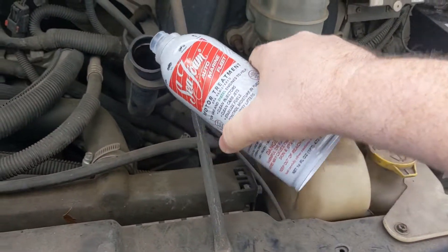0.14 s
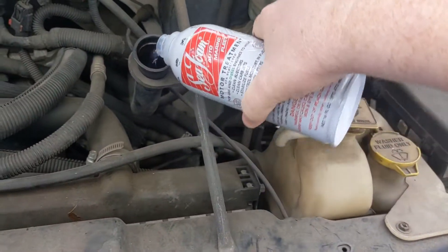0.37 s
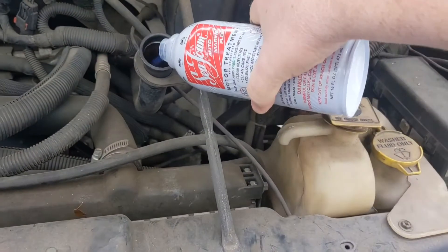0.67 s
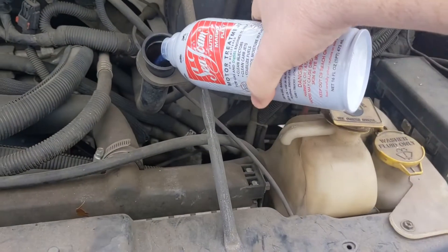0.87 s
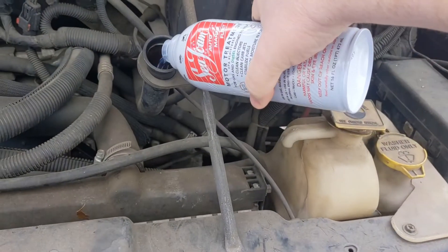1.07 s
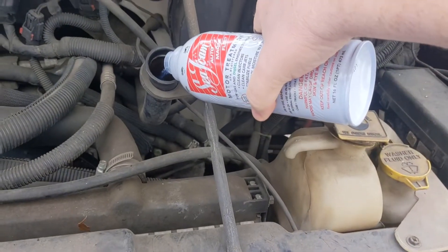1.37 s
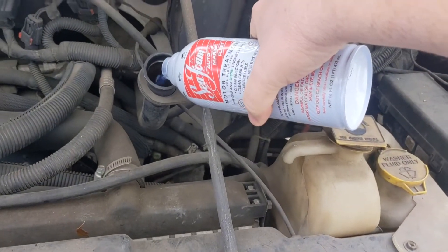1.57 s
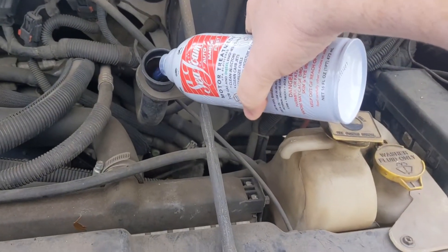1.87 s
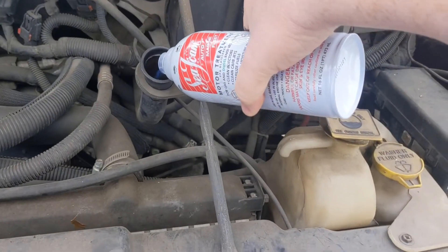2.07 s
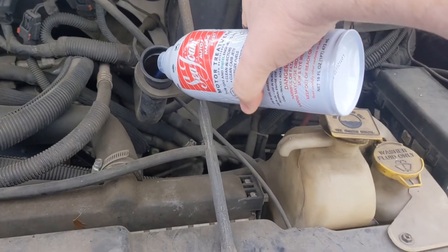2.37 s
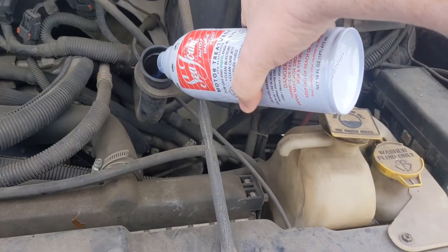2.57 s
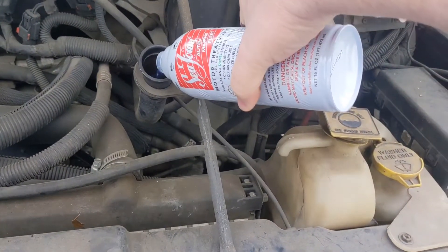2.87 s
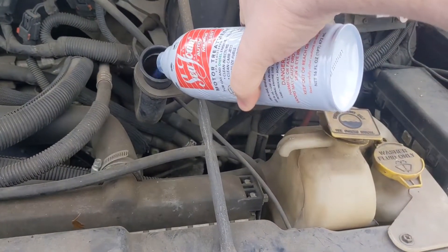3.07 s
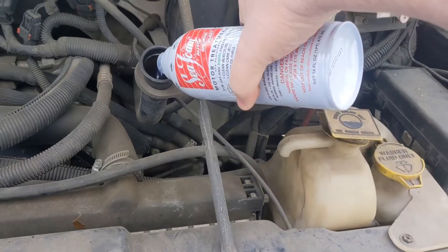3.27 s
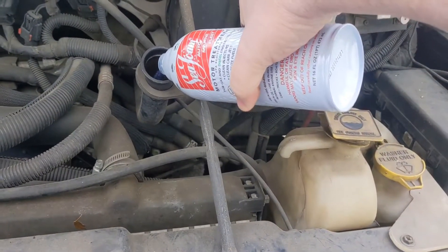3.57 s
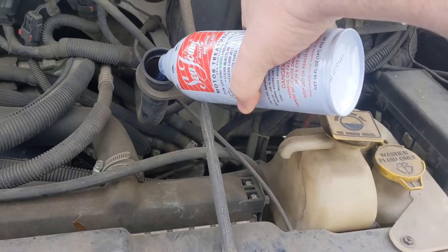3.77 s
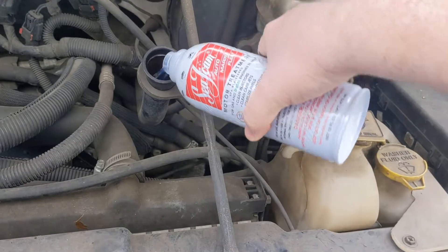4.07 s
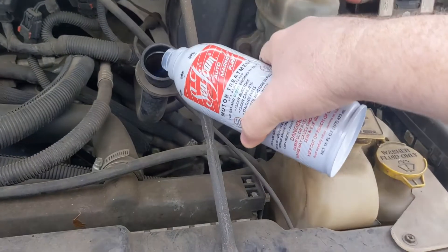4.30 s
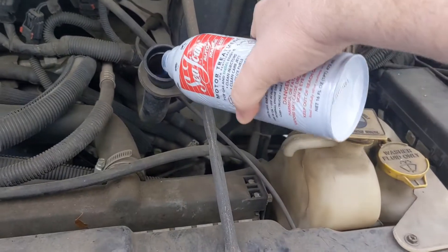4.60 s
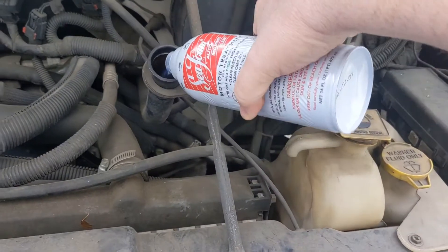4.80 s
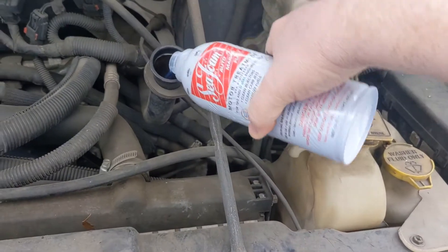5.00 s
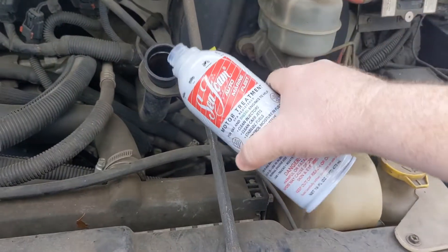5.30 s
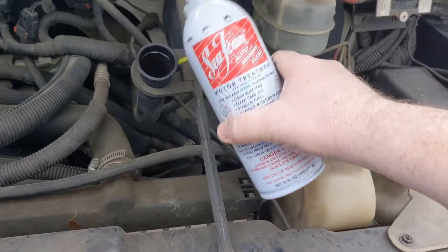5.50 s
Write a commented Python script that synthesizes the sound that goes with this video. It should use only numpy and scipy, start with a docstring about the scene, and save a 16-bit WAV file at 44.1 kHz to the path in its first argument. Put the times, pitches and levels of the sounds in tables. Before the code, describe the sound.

Thin liquid trickles and bubbles from a metal can into a hollow engine filler neck while low breeze buffets the microphone outdoors.

```python
"""Outdoors, a thin liquid runs from a metal can into an engine's oil filler neck, close to a camera.
From the start the stream rushes, treble hiss rises and falls and a breeze (all shaped noise) buffets both ports.
Films burst (noise bursts) in the hollow neck (resonances), and gusts follow with eddies (slow swings).
Bubbles then plink (damped sines that sharpen), drops tick (short noise) and later the can gulps low.
The breeze drops for a moment partway, then returns; faint outdoor air (noise) lies under it all."""
import sys
import numpy as np
from scipy import signal
from scipy.fft import rfft, irfft, next_fast_len
from scipy.io import wavfile
from scipy.ndimage import uniform_filter1d, map_coordinates

SR = 44100
rng = np.random.default_rng(int(sys.argv[2]) if len(sys.argv) > 2 else 0)


def store_wav(level_fs):
    """Save 16-bit WAV to argv[1]."""
    pcm = np.round(np.clip(np.atleast_2d(level_fs), -1, 1) * 32767)
    wavfile.write(sys.argv[1], SR, pcm.T.astype(np.int16))


N = 249165
TOP_HZ = 15900  # band limit, also the highest grain pitch

# a bubble at MIDDLE_HZ with no rise rings for RING_T60_S; larger ones ring longer, by RING_POWER
RING_T60_S, RING_POWER, MIDDLE_HZ = 0.019, 0.79, 3000
# per share of rise in pitch: slower swell (s) and longer ring (share)
SWELL_S, LINGER = 0.0067, 3.55
DROP_CYCLES = 50  # cycles in which the finest spray drops fall 60 dB

# gusts at the ports, levels before trims: peak_s, swell_db, half_length_s (to 1/e), eddy_hz, tearing_db
GUSTS = [(0.275, -28, 0.027, 112, -56), (0.385, -22, 0.0061, 104, -65.5), (0.495, -19, 0.038, 117, -35),
         (0.61, -20.5, 0.016, 141, -43), (0.69, -19.5, 0.026, 105, -50), (0.765, -24.5, 0.0075, 151, -37),
         (0.868, -20.5, 0.022, 138, -51), (0.96, -14, 0.03, 139, -35), (1.027, -11.5, 0.018, 156, -71),
         (1.095, -17, 0.023, 137, -52), (1.23, -26, 0.025, 179, -55), (1.315, -14, 0.035, 177, -38),
         (1.365, -17, 0.023, 128, -55), (1.465, -19, 0.03, 200, -34), (1.565, -13.5, 0.03, 190, -49),
         (1.654, -14, 0.028, 107, -45), (1.7, -19.5, 0.016, 193, -38), (1.874, -10, 0.022, 173, -51),
         (1.955, -19, 0.014, 220, -42), (1.995, -15.5, 0.038, 188, -56), (2.077, -20, 0.026, 197, -44),
         (2.145, -31, 0.017, 103.5, -54), (2.215, -23.5, 0.035, 132, -55), (2.285, -27, 0.029, 116, -61),
         (2.392, -18.5, 0.03, 107, -54), (2.474, -16.5, 0.0081, 93.4, -57), (2.65, -20.5, 0.025, 147, -52),
         (2.7, -21.5, 0.019, 130, -47), (3.165, -26, 0.058, 171, -43.5), (3.23, -18, 0.025, 132, -42),
         (3.39, -35, 0.032, 109, -61), (5.602, -35, 0.008, 90, -62), (3.965, -11.5, 0.027, 123, -27.5),
         (4.11, -26, 0.0096, 210, -28), (4.19, -10, 0.028, 182, -28.5), (4.27, -17, 0.0072, 189, -24),
         (4.45, -21, 0.017, 176, -35.5), (4.955, -21.5, 0.03, 87, -43), (5.138, -18.5, 0.034, 184, -48),
         (5.3, -23.5, 0.03, 88, -69)]


def amp(db):
    """Decibels to gain."""
    return 10 ** (np.asarray(db) / 20)


def unit(x):
    """Scale to rms 1."""
    return x / np.sqrt(np.mean(x ** 2) + 1e-20)


def along(points, hz):
    """Read (Hz, value) points on a log frequency axis."""
    f, v = np.transpose(points)
    return np.interp(np.log(hz + 1), np.log(f + 1), v)


def curves(rows):
    """One value per sample for each column after the time."""
    s, *cols = np.transpose(rows)
    return [np.interp(np.arange(N) / SR, s, c) for c in cols]


def wobble(rate_hz):
    """A smooth random curve with rate_hz knots a second."""
    knots = rng.standard_normal(int(N * rate_hz / SR) + 4)
    return map_coordinates(knots, [np.arange(N) * rate_hz / SR])


def filtered(x, response):
    """Apply a complex response of frequency to x."""
    m = next_fast_len(N + SR // 2)
    return irfft(rfft(x, m) * response(np.fft.rfftfreq(m, 1 / SR)), m)[..., :N]


def noise(spectrum, alike=0):
    """Two-port coloured noise of rms 1; alike is the share of power common to both ports."""
    left, right, common = rng.standard_normal((3, N))
    share = np.clip(alike, 0, 1)
    pair = np.sqrt(1 - share) * np.array([left, right]) + np.sqrt(share) * common
    return unit(filtered(pair, lambda hz: amp(along(spectrum, hz))))


def patchy(x, depth_db):
    """Brief bright and dull patches, scattered over time and pitch, alike at both ports; rms 1."""
    z = signal.stft(x, nperseg=256)[2]
    field = rng.standard_normal(z.shape[1:])
    field = uniform_filter1d(field, size=9, axis=0)
    field = uniform_filter1d(field, size=4, axis=1)
    return unit(signal.istft(z * amp(depth_db * unit(field)), nperseg=256)[1][:, :N])


def add(track, s, sound):
    """Mix a sound into the track at s seconds."""
    start = int(np.clip(round(s * SR), 0, N - 1))
    part = sound[..., :N - start]
    track[..., start:start + part.shape[-1]] += part


def grains(s, db, hz, cycles):
    """Tiny damped rings, each falling 60 dB in the given cycles unless its short window ends first."""
    t = np.arange(SR // 120) / SR
    turns = np.clip(hz, 700, TOP_HZ)[:, None] * t
    decay = amp(-60 * turns / cycles)
    attack = 1 - np.exp(-turns / 2)
    rings = amp(db)[:, None] * np.sin(2 * np.pi * turns) * decay * attack
    rings = rings * np.linspace(1, 0, len(t))
    at = (np.maximum(s, 0) * SR).astype(int)[:, None] + np.arange(len(t))
    return np.bincount(at.ravel(), rings.ravel(), N)[:N]


def spatter(s, db, hz, length_s, spread, cycles, count, fade_db=10, scatter_db=8):
    """A shower of grains starts with each event, thinning and fading over its length."""
    jitter, size, strength = rng.random((len(s), 3, count)).transpose(1, 0, 2)
    late = (np.arange(count) + jitter) / count
    when = s[:, None] + length_s * late ** 1.8
    level = db[:, None] - fade_db * late - scatter_db * strength
    pitch = np.reshape(hz, (-1, 1)) * np.exp(spread * (2 * size - 1))
    return grains(when.ravel(), level.ravel(), pitch.ravel(), cycles)


def plink(hz, t60_s, rise, waver, attack_s, glide=0.46):
    """A trapped bubble rings unsteadily and sharpens as it nears the surface, fastest at first."""
    t = np.arange(SR // 8) / SR
    drift = np.interp(t, np.linspace(0, t[-1], 60), rng.standard_normal(60))
    pitch = hz * (1 + rise * (.85 - np.exp(-t / (glide * t60_s))) + waver * drift)
    shape = amp(-60 * t / t60_s) * (1 - np.exp(-t / attack_s))
    return np.sin(2 * np.pi * np.cumsum(pitch) / SR) * shape / shape.max()


def bubble(hz, rise, waver=0.03, attack_cycles=0.34):
    """The larger a bubble, the lower it sounds, the softer it starts and the longer it rings."""
    t60_s = RING_T60_S * (MIDDLE_HZ / hz) ** RING_POWER * (1 + LINGER * rise)
    return plink(hz, t60_s, rise, waver, attack_cycles / hz + SWELL_S * rise)


def outdoor_air(level_db=-44.0):
    """Faint steady outdoor air: noise that weakens towards the treble."""
    # hz, relative_db
    spectrum = [(60, 7.5), (500, -11), (1000, -20), (1900, -20.5), (6000, -29.5), (15000, -41.5)]
    return amp(level_db) * noise(spectrum)


def wind(breeze_db=0, gust_db=-1, lump_db=2, surge_db=3, left_db=1.94):
    """Gusts swell over a breeze that surges at both ports; each port is also pushed in its own lumps."""
    # breeze between gusts, before trims: time_s, buffet_db
    breeze_points = [(0.0, -33.5), (0.8, -24), (1.05, -17), (1.17, -24.5), (1.62, -19.5), (1.79, -26),
                     (2.0, -21), (2.35, -27.5), (2.8, -28.5), (3.07, -43.5), (3.2, -32), (3.72, -49),
                     (3.83, -38.5), (3.99, -19.5), (4.3, -17), (4.72, -34), (4.86, -25), (5.22, -43),
                     (5.33, -28.5), (5.64, -33.5)]
    # buffeting spectrum: hz, relative_db
    buffet = [(12, -61), (20, -31), (54, -0.5), (97, 2), (144, 2.5), (205, -6), (499, -35), (767, -48.5),
              (900, -48.5), (1170, -51.5), (1980, -120)]
    buffet_db, = curves(breeze_points)
    t = np.arange(N) / SR
    breeze = amp(buffet_db + breeze_db + surge_db * wobble(21.914))
    swells = sum(amp(db + gust_db) * np.exp(-((t - s) / length_s) ** 2)
                 for s, db, length_s, _, _ in GUSTS)
    lumps = amp(lump_db * np.array([wobble(35), wobble(35)]))
    buffeting = unit(lumps * noise(buffet, alike=0.25))
    return np.hypot(breeze, swells) * buffeting * amp([[left_db], [-left_db]])


def pour():
    """Liquid sounds ring in the neck and echo in the bay; the hiss and the stream bypass both."""
    # flow, before trims: time_s, trickle_db, hiss_db
    flow = [(0.0, -57, -70.5), (0.65, -51.5, -69.5), (0.84, -58.5, -71), (0.94, -53.5, -61),
            (1.06, -55.0, -64), (1.59, -45.5, -55), (2.3, -51.5, -54), (2.39, -49, -47.5),
            (2.99, -51.5, -56), (3.09, -50, -46), (3.21, -54.0, -56.5), (3.56, -51, -51.5),
            (4.14, -53, -63), (4.19, -52.5, -54), (5.24, -58, -60.5), (5.36, -50, -57),
            (5.64, -56.5, -57.5)]
    # level of neck and hiss at the left port over the right: hz, left_over_right_db
    balance = [(700, -0.5), (1300, 2), (2400, 0.5), (3400, 14.5), (4400, 11), (8000, 0), (11000, 2.5),
               (15000, -18)]
    flow_db, hiss_db = curves(flow)
    hiss_db = hiss_db + 2.2 * wobble(16)
    churn_db = (flow_db + hiss_db) / 2
    crackle = droplets(hiss_db + 5, centre_hz=8000, spread=0.4, length_s=0.005,
                       cycles=6, scatter_db=20, count=420)
    drops = droplets(churn_db + 3, centre_hz=4300, spread=0.6, length_s=0.0083,
                     cycles=20, scatter_db=19, count=300)
    small = burble(flow_db, level_db=-4.0, scatter_db=10, centre_hz=2400, spread=0.75,
                   most_rise=0.3, count=330)
    tiny = burble(hiss_db, level_db=-2.5, scatter_db=13.5, centre_hz=9220, spread=0.48,
                  most_rise=0.05, count=330)
    inside = bubbles() + small + tiny + splats() + ticks() + drops + crackle + wet_patter(flow_db)
    mixed = bay(neck(inside)) + treble_hiss(hiss_db)
    balanced = filtered(mixed, lambda hz: amp(along(balance, hz) * [[.5], [-.5]]))
    return balanced + stream(flow_db)


def stream(flow_db, level_db=-3.5, left_db=3.0):
    """The soft rush of the stream: patchy noise that follows the flow, stronger at the left."""
    # hz, relative_db
    spectrum = [(400, -12), (700, 3), (1000, -1), (1400, 9), (1950, 15), (2500, -0.5), (3100, 3),
                (4000, 3.5), (5500, 1), (8000, -6), (16000, -26)]
    rush = patchy(noise(spectrum, alike=0.076), depth_db=3.5)
    return amp(flow_db + level_db) * rush * amp([[left_db], [-left_db]])


def treble_hiss(hiss_db, level_db=-5):
    """Treble hiss: patchy high noise whose level rises and falls."""
    # hz, relative_db
    spectrum = [(2000, -58), (4500, -16), (7000, 9), (9000, 6), (12000, 14.5), (15000, -6), (16000, -20)]
    return amp(hiss_db + level_db) * patchy(noise(spectrum, alike=0.038), depth_db=6.5)


def wet_patter(flow_db, level_db=-8):
    """A wet patter inside the neck: strongly patchy noise that follows the flow."""
    # hz, relative_db
    spectrum = [(500, 10.5), (1000, 0.5), (1900, 11), (2600, -8.5), (3400, 0.5), (4400, 1.5), (7000, -22.5),
                (16000, -10.5)]
    return amp(flow_db + level_db) * patchy(noise(spectrum), depth_db=8)[0]


def droplets(level_db, centre_hz, spread, length_s, cycles, scatter_db, count):
    """Drops land at random, each in a little cluster whose strength follows the given level."""
    when, size, strength = rng.random((count, 3)).T
    db = level_db[(when * N).astype(int)] + scatter_db * strength ** 2
    pitch = centre_hz * np.exp(spread * (2 * size - 1))
    return spatter(when * N / SR, db, pitch, length_s, spread=0.12, cycles=cycles, count=4)


def burble(flow_db, level_db, scatter_db, centre_hz, spread, most_rise, count, crowding=2.2):
    """Fainter bubbles form at random, more and louder where flow_db is high; some chirp upwards."""
    out, formed = np.zeros(N), np.cumsum(amp(crowding * flow_db))
    for turn, size, strength, climb in rng.random((count, 4)):
        at = np.searchsorted(formed, turn * formed[-1])
        db = flow_db[at] + level_db + scatter_db * strength ** 2
        hz = centre_hz * np.exp(spread * (2 * size - 1))
        add(out, at / SR, amp(db) * bubble(hz, most_rise * climb ** 2))
    return out


def neck(x, ring_db=1, direct_db=-3):
    """Sound leaves directly and through resonances, with random mode phases at each port."""
    # resonances of filler neck and can, before ring_db: centre_hz, width_hz, level_db
    resonances = [(750.6, 28.3, 11.5), (1034, 14, 0), (1306, 24, -0.5), (1620, 18, -39), (1764, 54, -3.5),
                  (1866, 22, -5), (2020, 54, -4), (2271.6, 19.4, 6), (2590, 11, -1), (3185, 31, 6),
                  (3490, 230, -9), (4234, 220, 7.5), (4730, 220, 3), (6140, 540, 0.5), (6580, 770, 1.5)]

    def response(f):
        modes = np.array([amp(db + ring_db) * 1j * f * w / (c * c - f * f + 1j * f * w)
                          for c, w, db in resonances])
        turn = np.exp(1j * rng.normal(0, 0.52, (2, len(resonances))))
        return amp(direct_db) + turn @ modes
    return filtered(x, response)


def bay(x, wet_db=-1.5, walls_db=-2, count=10):
    """Hoses, covers and the open bonnet scatter near echoes and a short tail, different at each port."""
    # engine bay decay: hz, t60_s
    decay = [(500, 0.24), (3000, 0.064), (12000, 0.1)]
    hz, t, z = signal.stft(rng.standard_normal((2, SR // 4)), SR, nperseg=256)
    tail = signal.istft(z * amp(-60 * t / along(decay, hz)[:, None]), SR, nperseg=256)[1]
    echo = amp(wet_db) * tail / np.linalg.norm(tail[0])
    for port in echo:
        at = (rng.uniform(.0003, .007, count) * SR).astype(int)
        port[at] += amp(walls_db) * rng.choice([-1, 1], count) / np.sqrt(count)
    return x + signal.fftconvolve(x, echo, axes=1)[:, :N]


def splats(hollow_db=-3.5, crack_db=-1, spray_db=2, snap_db=0, thud_db=-12):
    """A film bursts: a sharp snap, a hollow pop with a soft thud, a wet crack and a spray of drops."""
    hollow_t60_s, snap_t60_s, crack_length_s, spray_length_s = 0.052, 0.026, 0.015, 0.031
    # loudest films, before trims: start_s, level_db, hollow_db and spray_db (both relative to level_db)
    films = [(0.022, -42.5, -12, -2), (0.082, -40.5, -5, -19), (0.485, -29, -11.5, -23),
             (0.504, -48.5, 8.5, 6.5), (0.633, -29.5, -26, -15), (0.742, -43.5, 7.5, -7),
             (0.876, -35.5, -2.5, -9.5), (0.927, -33, -8, -6.5), (0.966, -27, -3.5, -14),
             (1.101, -48.5, 7.5, -1), (1.226, -26, -6, -17), (1.342, -33, -13, -3.5), (1.502, -40, 5, -16),
             (1.631, -21, -25, -13.5), (1.752, -30, -16, -13), (1.815, -37.5, -0.5, -5.5),
             (1.99, -27, -10, -17), (2.124, -35.5, -0.5, -10), (2.338, -31, -27, -12),
             (2.375, -23.5, -16.5, -31), (2.408, -29.5, -8.5, -7), (2.5573, -27, -3.5, -36),
             (2.677, -31.5, -9, -23), (2.748, -27.5, -12, -12.5), (2.8, -28.5, -4, -14),
             (2.955, -51, 10, -19), (3.053, -36, -13, -15), (3.089, -26, 6.5, -32), (3.548, -43, -2, 4.5),
             (3.605, -40, 1, -12), (3.657, -48.5, 8, 9.5), (3.812, -26, -10.5, -12), (3.873, -40, -4, -8),
             (3.914, -35, -3.5, -2.5), (3.983, -43.5, 7, -5), (4.167, -33.5, -24, -6),
             (4.197, -35.5, -2, -6), (4.428, -46.5, 9, 3.5), (4.674, -31, -2.5, -26),
             (4.759, -33.5, -6.5, -5.5), (4.8, -31.5, -7, -10), (4.843, -31.5, -7.5, -20),
             (4.895, -41, 11, -30), (5.391, -39, -2, -7)]
    out, t = np.zeros(N), np.arange(SR // 10) / SR
    pop_band = signal.butter(3, [1050, 2200], "band", fs=SR, output="sos")
    thud_band = signal.butter(2, [300, 480], "band", fs=SR, output="sos")
    for s, db, hollow, spray in films:
        air = unit(signal.sosfilt(pop_band, rng.standard_normal(len(t))))
        thud = unit(signal.sosfilt(thud_band, rng.standard_normal(len(t))))
        pop = (air + amp(thud_db) * thud) * amp(hollow + hollow_db - 60 * t / hollow_t60_s)
        snap = rng.standard_normal(len(t)) * amp(spray + snap_db - 60 * t / snap_t60_s)
        add(out, s, amp(db) * (pop + snap))
    s, db, _, spray = np.transpose(films)
    crack = spatter(s, db + crack_db, 3960, crack_length_s, spread=0.44,
                    cycles=DROP_CYCLES / 2, count=18)
    mist = spatter(s, db + spray + spray_db, 8880, spray_length_s, spread=0.4,
                   cycles=DROP_CYCLES, count=26)
    return out + crack + mist


def eddies(level_db=3, cycles=1.19, right_db=-4, octave_db=-11, tear_db=-3):
    """A gust's eddy swings the pressure briefly, with a weaker octave, and tears on the camera's edge."""
    # tearing spectrum: hz, relative_db
    tear = [(150, -60), (300, 12.5), (600, -5), (800, -13.5), (1100, -41), (2500, -63), (6000, -120)]
    out, tearing = np.zeros((2, N)), np.zeros(N)
    t = np.arange(-SR // 20, SR // 20) / SR
    for s, db, length_s, hz, rip_db in GUSTS:
        phase = 2 * np.pi * (hz * t + rng.random((2, 1)))
        swing = np.sin(phase) + amp(octave_db) * np.sin(2 * phase)
        swing = swing * np.exp(-(hz * t / cycles) ** 2)
        add(out, s + t[0], amp(db + level_db) * swing * amp([[0], [right_db]]))
        add(tearing, s + t[0], amp(rip_db + tear_db) * np.exp(-(t / length_s) ** 2))
    return out + tearing * noise(tear, alike=1.0)


def bubbles(level_db=-2.0, twins_db=-6, twins_length_s=0.02):
    """Each loud bubble rings in the churning liquid, amid a splash of smaller ones."""
    # loudest bubbles, before trims: start_s, level_db, nominal pitch_hz, rise (share of pitch)
    loudest = [(0.632, -36, 3680, 0.056), (0.676, -34, 1150, 0.056), (0.889, -30.5, 3900, 0.031),
               (0.972, -28, 3510, 0.063), (1.26, -38.5, 4000, 0.044), (1.276, -28.5, 1813, 0.32),
               (1.411, -42, 2980, 0.11), (1.523, -35.5, 1900, 0.33), (1.534, -36, 3790, 0.18),
               (1.576, -26, 7090, 0.014), (1.632, -27, 4340, 0.055), (1.632, -25.5, 3060, 0.03),
               (1.651, -27, 2100, 0.14), (1.681, -28.5, 1128, 0.066), (1.728, -43.5, 723, 0.052),
               (1.754, -33, 3250, 0.043), (1.822, -40.5, 3890, 0.22), (2.004, -23, 10050, .03),
               (2.151, -34, 1740, 0.11), (2.341, -26.5, 5350, .04), (2.347, -30, 3424, 0.034),
               (2.401, -21.5, 2496, 0.068), (2.408, -27.5, 2980, 0.11), (2.427, -32, 3850, 0.12),
               (2.508, -23.5, 4300, 0.04), (2.542, -35.5, 3200, 0.046), (2.558, -30.5, 4640, 0.038),
               (2.631, -32, 1146, 0.1), (2.68, -38, 3176, 0.029), (2.69, -27, 1213, 0.069),
               (2.768, -14.5, 1895, 0.058), (3.148, -30, 2320, 0.075), (3.304, -40.5, 3200, .05),
               (3.353, -23.5, 3480, 0.042), (3.461, -33.5, 3374, 0.037), (3.675, -38, 2200, 0.057),
               (3.804, -34.5, 1940, .04), (3.833, -28, 2257, 0.052), (3.888, -34.5, 1975, 0.13),
               (3.959, -42, 3060, .12), (3.987, -42.5, 3350, .06), (4.201, -24.5, 2560, 0.039),
               (4.563, -33.5, 7370, 0.023), (4.677, -33.5, 3310, 0.044), (4.801, -34.5, 4600, .05),
               (4.843, -32.5, 3290, 0.096), (5.375, -39.5, 4070, 0.1)]
    out = np.zeros(N)
    for s, db, hz, rise in loudest:
        add(out, s, amp(db + level_db) * bubble(hz, rise))
    s, db, hz, _ = np.transpose(loudest)
    twins = spatter(s, db + twins_db, 1.218 * hz, twins_length_s, spread=0.51,
                    cycles=DROP_CYCLES / 2, count=9)
    return out + twins


def ticks(level_db=-4, t60_s=0.026, width=0.27):
    """A drop strikes the neck wall: a dry, fast-fading noise tick in a narrow band (width in log Hz)."""
    # loudest drops, before level_db: start_s, level_db, centre_hz
    strikes = [(1.247, -37, 5960), (1.509, -39, 12800), (1.859, -38.5, 6450), (2.189, -36.5, 9200),
               (2.314, -41, 6000), (2.595, -36.5, 5760), (2.624, -33, 11800), (2.716, -39, 4140),
               (3.041, -37, 10600), (3.055, -36, 5150), (3.385, -38, 8450), (3.489, -43.5, 8300),
               (4.186, -35.5, 10100), (4.51, -39, 12400), (4.956, -34.5, 13800), (5.058, -41.5, 4800),
               (5.29, -41.5, 12200), (5.434, -40, 4630), (5.537, -37, 13500)]
    out, t = np.zeros(N), np.arange(SR // 25) / SR
    f = np.fft.rfftfreq(len(t), 1 / SR) + 1
    for s, db, hz in strikes:
        band = np.exp(-.5 * (np.log(f / hz) / width) ** 2)
        burst = unit(irfft(rfft(rng.standard_normal(len(t))) * band, len(t)))
        add(out, s, amp(db + level_db - 60 * t / t60_s) * burst)
    return out


def glugs(level_db=-3, t60_s=0.1):
    """A large bubble enters the can and rings low, with a soft start."""
    # air gulped by the can, before level_db: start_s, level_db, nominal pitch_hz
    gulps = [(2.35, -37, 572), (3.952, -34, 645), (4.168, -20, 545), (4.203, -37, 752)]
    out = np.zeros(N)
    for s, db, hz in gulps:
        add(out, s, amp(db + level_db) * plink(hz, t60_s, rise=0.049, waver=0.057, attack_s=0.001))
    return out


def scene():
    """The pour and the can's gulps in the breeze, over faint outdoor air."""
    return outdoor_air() + wind() + pour() + eddies() + glugs()


def record(dry):
    """The camera cuts the deepest rumble, rounds off the highest peaks and stops at its band limit."""
    thinned = signal.sosfilt(signal.butter(3, 38, "high", fs=SR, output="sos"), dry)
    rounded = thinned / (1 + np.abs(thinned / .95) ** 6) ** (1 / 6)
    return filtered(rounded, lambda hz: hz < TOP_HZ)


dry = scene()
out = record(dry)
store_wav(out)
```